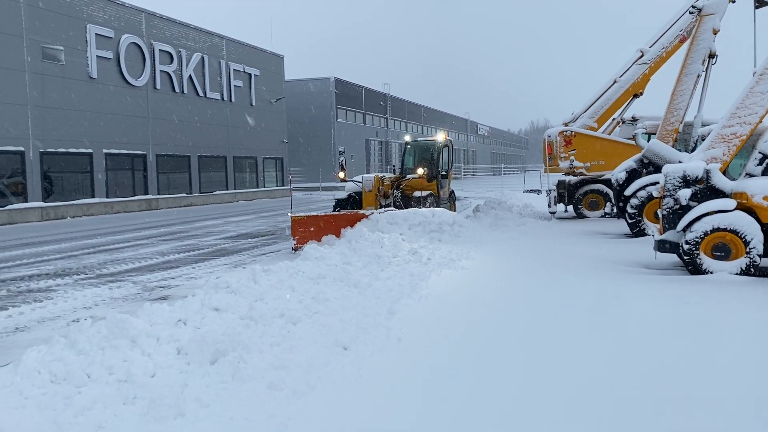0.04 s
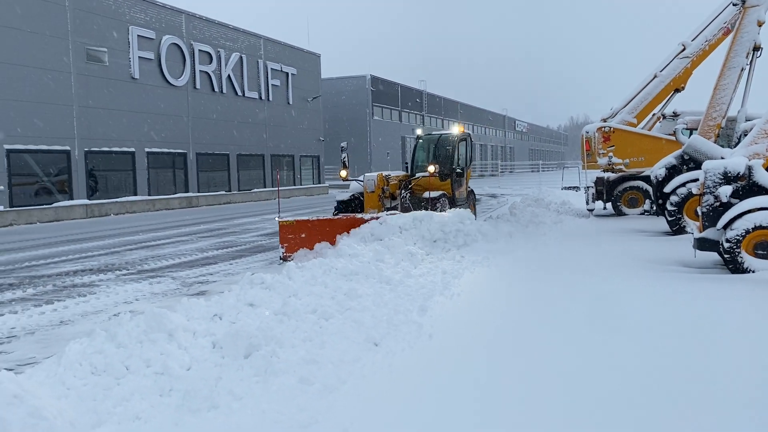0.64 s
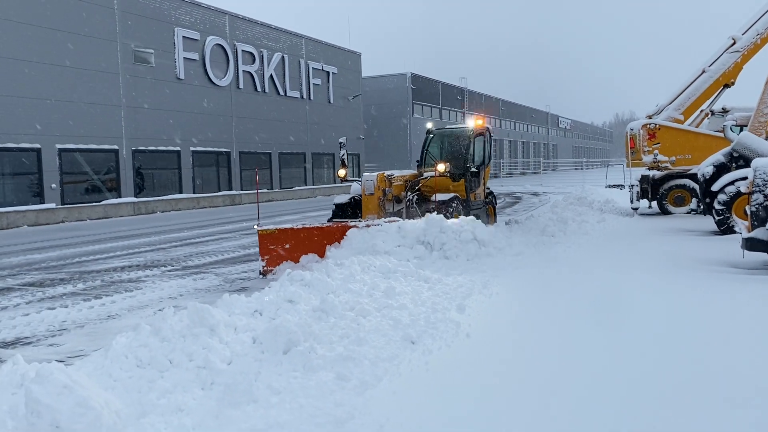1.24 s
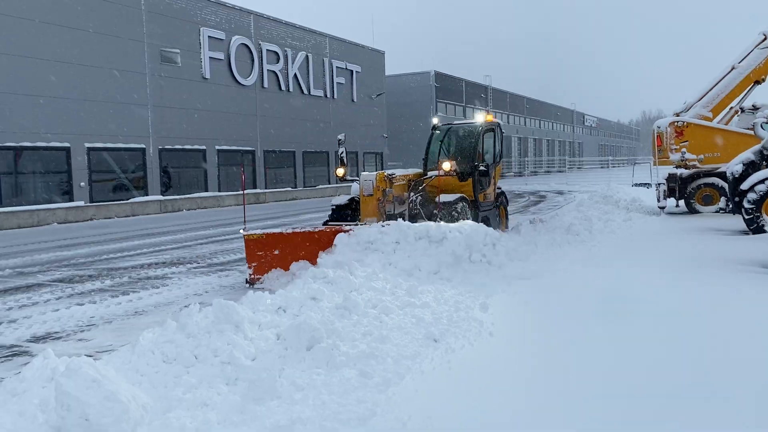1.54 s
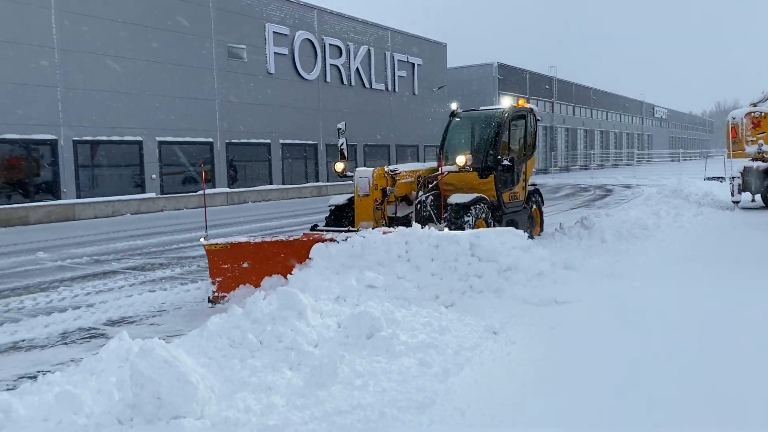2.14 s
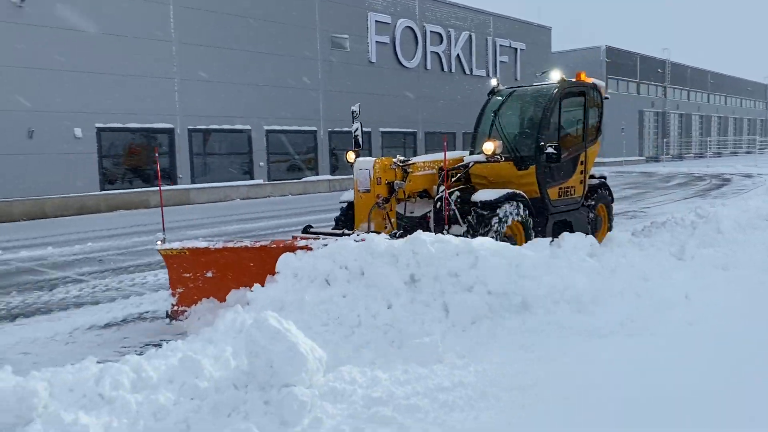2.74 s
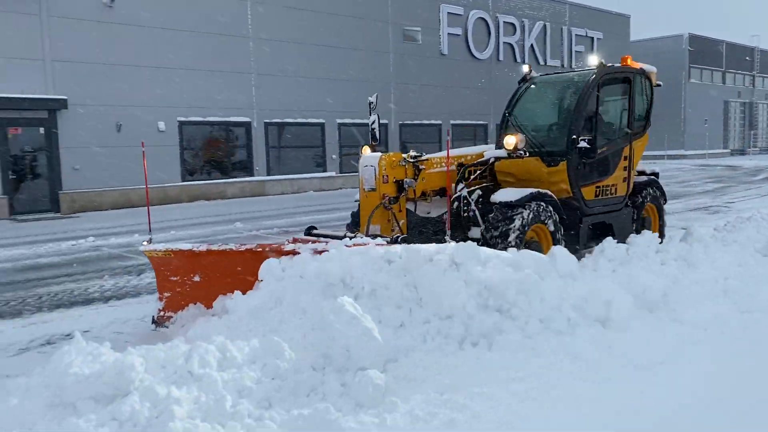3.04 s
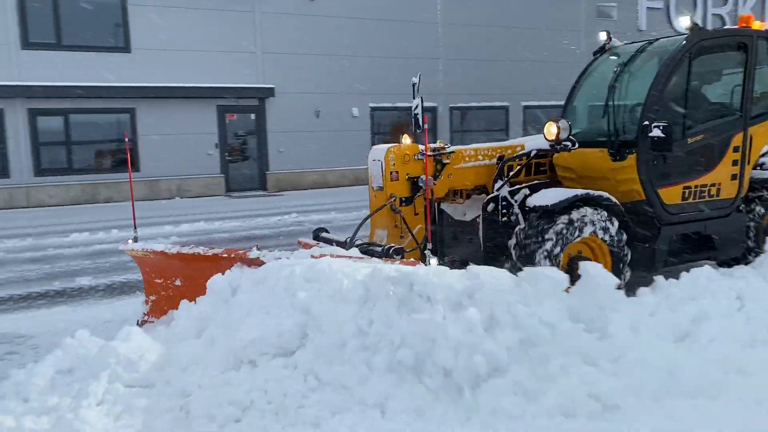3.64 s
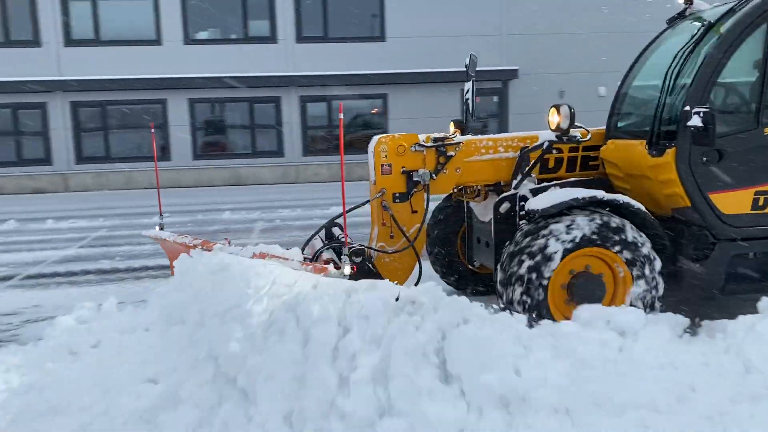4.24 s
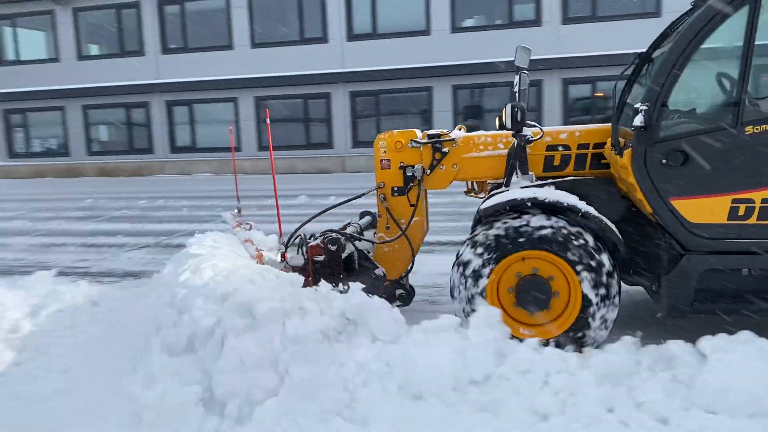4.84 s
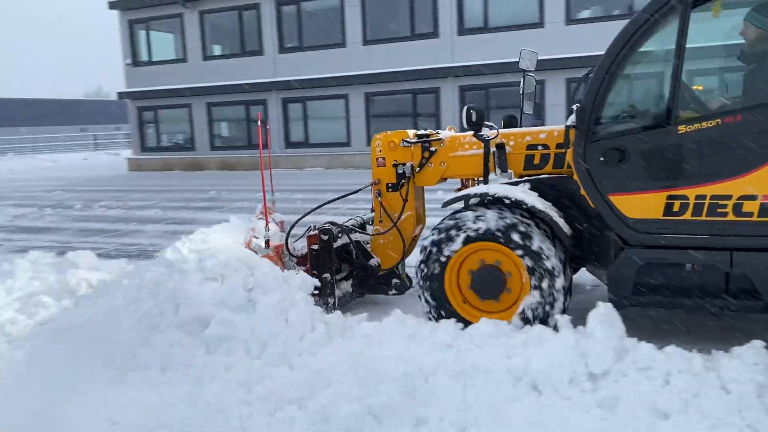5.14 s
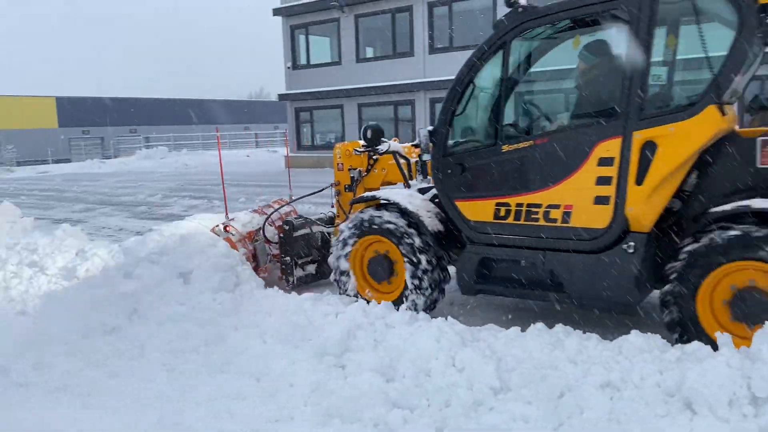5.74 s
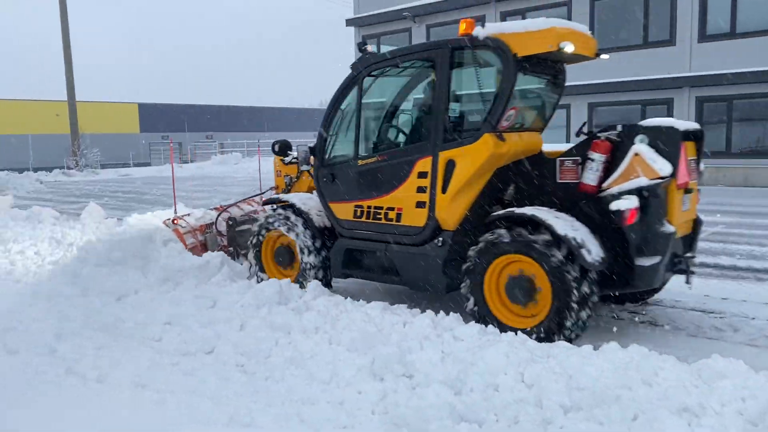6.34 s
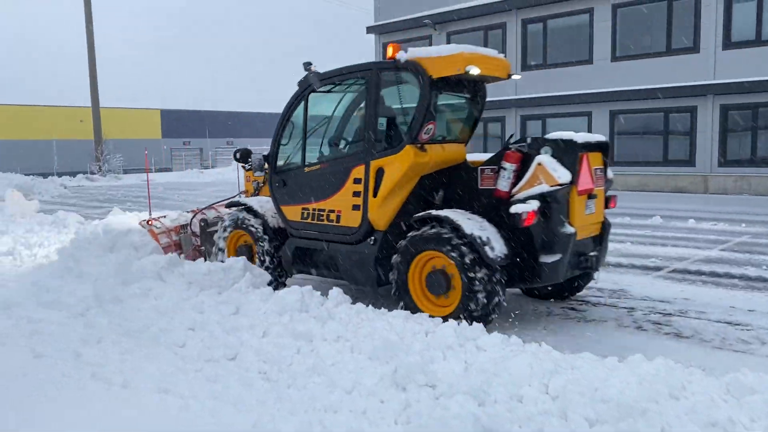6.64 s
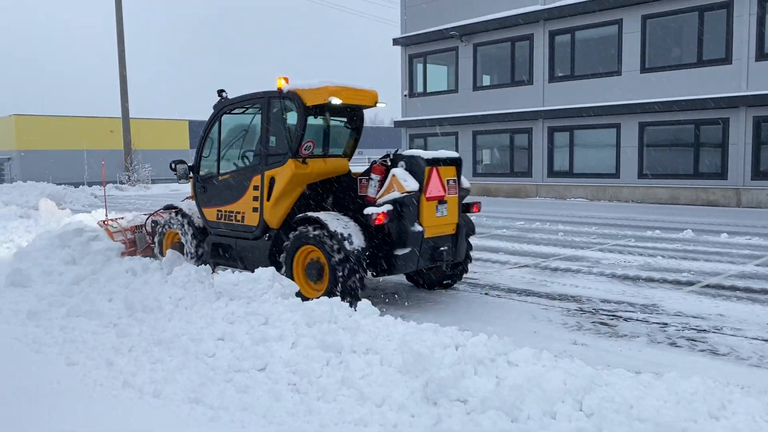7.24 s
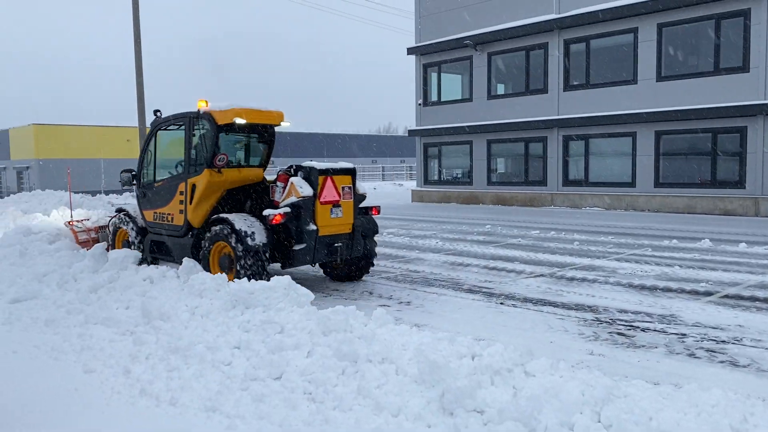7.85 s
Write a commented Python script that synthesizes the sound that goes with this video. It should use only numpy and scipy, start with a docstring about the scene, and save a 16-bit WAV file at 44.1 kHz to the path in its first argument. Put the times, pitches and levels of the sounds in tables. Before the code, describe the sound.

A diesel loader ploughs snow across an open yard, approaching and passing close to the microphone. Its engine drones, growls and clatters steadily under a wavering hydraulic and gear whine. The blade rumbles and thumps over packed ridges while snow hisses, ticks and crunches faintly. A metal knock comes during the approach and a louder one just after the blade passes. The exhaust drone then deepens in strength as the machine moves away.

```python
"""A diesel telehandler ploughs snow across a yard and passes close by.
Its four-cylinder engine drones through the exhaust, growls, clatters and turns a pump and a fan.
The hydraulic motor's pistons and the axle gears whine with ground speed. The blade rumbles through
the snow, bumps over packed ridges and knocks in its slack mounts. Snow slides, crackles and hisses
under the rear tyre; icy crumbs tick and the crust breaks in short crunches."""
import sys
import numpy as np
from scipy import signal
from scipy.fft import rfft, irfft, next_fast_len
from scipy.io import wavfile
from scipy.ndimage import map_coordinates

SR = 44100
rng = np.random.default_rng(int(sys.argv[2]) if len(sys.argv) > 2 else 0)


def bounce(signal):
    """Save signal as a 16-bit WAV file at the path given by the first command-line argument."""
    frames = np.transpose(np.atleast_2d(signal))
    limited = np.clip(frames, -1, 1)
    pcm = np.round(limited * 32767).astype(np.int16)
    wavfile.write(sys.argv[1], SR, pcm)


N = 351918
TIME_S = np.arange(N) / SR
HIT_S = np.arange(SR // 4) / SR  # time axis of one impact
BLADE_PASS_S, TRAVEL_M_PER_S, CLOSEST_M = 4.51, 1.935, 3.47
BANK_MIDDLE_S, TICK_T60_S = 4.5, 0.012


def amp(db):
    return 10 ** (np.asarray(db) / 20)


def unit(x):
    return x / np.sqrt(np.mean(x ** 2) + 1e-20)


def along(points, hz):
    """Interpolate (Hz, value) points on a log axis."""
    point_hz, values = np.transpose(points)
    return np.interp(np.log(hz + 1), np.log(point_hz + 1), values)


def curve(rows, column=1):
    """One column of a time table, per sample."""
    columns = np.transpose(rows)
    return np.interp(TIME_S, columns[0], columns[column])


def wobble(knots_per_s):
    """Smooth random curve."""
    knots = rng.standard_normal(4096)
    coarse = np.arange(0, N + 64, 64)
    smooth = map_coordinates(knots, [coarse * knots_per_s / SR], mode="wrap")
    return np.interp(np.arange(N), coarse, smooth)


def filtered(x, response):
    """Apply a complex frequency response."""
    size = next_fast_len(N + SR // 4)
    return irfft(rfft(x, size) * response(np.fft.rfftfreq(size, 1 / SR)), size)[..., :N]


# Left-right likeness: (frequency [Hz], correlation [0-1])
COHERENCE = [(100, 0.95), (300, 0.94), (600, 0.55), (900, 0.2), (2000, 0.52), (3300, 0.18), (5700, 0.065),
             (7500, 1), (8500, 1), (16000, 0.9)]
def spread(pair, spectrum):
    """Colour two unrelated signals into left and right, alike in the bass and top treble."""
    def response(hz):
        turn = np.arccos(np.clip(along(COHERENCE, hz), -1, 1)) / 2
        roll_off = 1 / (1 + (hz / spectrum[-1][0]) ** 4)
        return amp(along(spectrum, hz)) * roll_off * np.array([np.cos(turn), np.sin(turn)])
    mid, side = filtered(pair, response)
    return np.array([mid + side, mid - side])


def rush(spectrum, source=None):
    """Coloured stereo noise, rms 1."""
    return unit(spread(rng.standard_normal((2, N)) if source is None else source, spectrum))


def angle(hz):
    """Running phase in radians."""
    return 2 * np.pi * np.cumsum(hz) / SR


def tone(phase, fade_db, fade_hz, blur_rad, blur_hz, width_rad, wander_hz=1.48):
    """Sine of rms about 1; shifting reflections make it fade, blur and wander between the ears."""
    apart = width_rad * wobble(wander_hz) * np.array([[1], [-1]])
    fade = amp(fade_db * np.tanh(wobble(fade_hz)))
    return np.sqrt(2) * fade * np.sin(phase + blur_rad * wobble(blur_hz) + apart)


def add(track, start_s, sound):
    """Mix a sound into a track."""
    part = track[..., round(start_s * SR):][..., :sound.shape[-1]]
    part += sound[..., :part.shape[-1]]


def burst(t60_s):
    """Decaying stereo noise."""
    return rng.standard_normal((2, len(HIT_S))) * amp(-60 * HIT_S / t60_s)


def shatter(impulses):
    """Turn each impulse into a short crack."""
    return signal.fftconvolve(impulses[None], burst(TICK_T60_S), axes=1)[:, :N]


def passing(db, behind_m, falloff):
    """Gain of a part behind_m behind the blade: db when closest, falling as 1 / distance ** falloff."""
    ahead_m = TRAVEL_M_PER_S * (TIME_S - BLADE_PASS_S) - behind_m
    return amp(db) * (CLOSEST_M / np.hypot(CLOSEST_M, ahead_m)) ** falloff


def in_bank(width_s):
    """Depth of the blade in the snow bank, 0-1."""
    return np.exp(-((TIME_S - BANK_MIDDLE_S) / width_s) ** 2)


# Exhaust drone: (time [s], relative fundamental level [dB], octave level [dB])
EXHAUST_DB = [(0, -35, -46), (.6, -32.5, -52), (1.3, -30, -42), (1.8, -35.5, -65), (2.5, -32.5, -35.5),
              (3.1, -27.5, -54), (3.45, -33.5, -43), (3.9, -32, -37.5), (4.65, -28, -31), (5.2, -23.5, -45),
              (5.6, -23, -29), (6.15, -23, -31), (6.95, -23, -43), (7.98, -23.5, -36.5)]
# Third exhaust harmonic: (time [s], level [dB])
EXHAUST_THIRD_DB = [(0, -54.5), (1.2, -48), (1.6, -43.5), (2.5, -39.5), (2.9, -45), (3.4, -42), (4.2, -40),
                    (5, -42), (5.6, -46), (6.2, -43.5), (7, -39.5), (7.98, -42.5)]
def exhaust(firing):
    """Firing pulses drone from a rear-facing tailpipe, louder once the machine has passed."""
    drone = tone(firing, fade_db=1, fade_hz=6.2, blur_rad=0.038, blur_hz=47, width_rad=0.017)
    octave = tone(2 * firing, fade_db=1.5, fade_hz=7.8, blur_rad=0.63, blur_hz=13, width_rad=0.089)
    third = tone(3 * firing, fade_db=4.5, fade_hz=5.6, blur_rad=0.26, blur_hz=13, width_rad=0.099)
    return (amp(curve(EXHAUST_DB) + 0.75) * drone
            + amp(curve(EXHAUST_DB, 2)) * octave
            + amp(curve(EXHAUST_THIRD_DB)) * third)


def engine_lines(firing, orders):
    """Unsteady tones at multiples of the firing rate."""
    return sum(
        amp(db) * tone(order * firing, fade_db=3.5, fade_hz=5, blur_rad=0.6, blur_hz=8, width_rad=0.17)
        for order, db in orders)


# Intake hum: (time [s], relative level of lower lines [dB], of upper line [dB])
INTAKE_DB = [(0, -47, -66), (1, -44, -56), (1.5, -39, -40), (2.5, -35, -41), (3.3, -38, -41.5),
             (3.9, -37.5, -40), (4.5, -36.5, -36), (5, -50, -32), (5.6, -39, -37.5), (5.8, -41, -50),
             (6.5, -37.5, -32.5), (6.8, -48, -40), (7.7, -38, -40.5), (7.98, -42, -51)]
# Lower intake lines: (order [x firing rate], relative level [dB])
INTAKE_LINES = [(4.5, -6), (4.75, -3)]
def intake(firing):
    """The air intake hums on three engine orders."""
    lower = amp(curve(INTAKE_DB)) * engine_lines(firing, INTAKE_LINES)
    upper = amp(curve(INTAKE_DB, 2)) * engine_lines(firing, [(5, -1.2)])
    return lower + upper


# Pump tone: (time [s], relative level [dB])
PUMP_DB = [(0, -55), (.05, -38.5), (.18, -46), (.27, -33), (.46, -59), (.55, -38), (.76, -47), (.87, -37),
           (1.2, -40), (1.38, -45.5), (1.48, -37.5), (1.58, -44.5), (1.71, -35), (1.86, -52), (1.94, -35),
           (2.36, -43.5), (2.62, -32.5), (2.82, -38), (2.92, -32), (3.27, -29.5), (3.38, -32),
           (3.47, -30.5), (3.58, -31.5), (3.74, -28), (4.09, -27.5), (4.21, -36), (4.46, -34), (4.7, -28.5),
           (4.9, -34.5), (5.04, -29), (5.18, -32), (5.28, -42), (5.45, -28), (5.55, -34), (5.83, -25.5),
           (6.06, -39.5), (6.26, -27.5), (6.47, -37), (6.6, -31), (6.92, -28), (7.2, -31), (7.46, -35.5),
           (7.55, -31.5), (7.98, -31.5)]
def pump(firing):
    """The pump whines at 9 x the firing rate; farther off, wall echoes make it flutter more."""
    flutter_db = 1 / passing(db=-4, behind_m=8.9, falloff=0.75)
    whine = tone(9 * firing, fade_db=flutter_db, fade_hz=14, blur_rad=0.1, blur_hz=36, width_rad=0.16)
    return amp(curve(PUMP_DB) + 0.5) * whine


# Fan tone: (time [s], level [dB])
FAN_DB = [(0, -46), (1, -46), (1.5, -56), (2.1, -53), (2.7, -40.5), (4.5, -49), (6, -41), (6.6, -46),
          (7.98, -42)]
# Cooling air: (frequency [Hz], relative density [dB])
RADIATOR_SPECTRUM = [(700, -20), (1200, 6), (1400, -2), (2000, -4.5), (3200, -22.5), (6000, -15)]
# Rear hiss: (frequency [Hz], relative density [dB])
RASP_SPECTRUM = [(2000, -16), (2800, -2), (3500, -5), (4100, -3), (5200, -18)]
def cooling_fan(firing):
    """The fan sings at 10 x the firing rate; air rushes and hisses at the rear."""
    fan = tone(10 * firing, fade_db=3, fade_hz=7.3, blur_rad=0.75, blur_hz=22, width_rad=0.61)
    air = passing(db=-43.5, behind_m=2, falloff=3.1) * rush(RADIATOR_SPECTRUM)
    rasp = passing(db=-52, behind_m=4.1, falloff=16) * rush(RASP_SPECTRUM)
    return amp(curve(FAN_DB)) * fan + air + rasp


def combustion_noise(firing, spectrum, repeat_share, depth, uneven):
    """Noise that pulses with each firing and partly repeats every four firings."""
    cycle_samples = round(4 * SR / FIRING_HZ[0][1])
    cycle_index = (firing / (8 * np.pi) % 1 * cycle_samples).astype(int)
    repeating = np.sqrt(repeat_share) * rng.standard_normal((2, cycle_samples))[:, cycle_index]
    fresh = np.sqrt(1 - repeat_share) * rng.standard_normal((2, N))
    # uneven cylinders beat at half the firing rate
    pulse = unit(np.exp(depth * np.cos(firing) + uneven * np.cos(firing / 2)))
    return rush(spectrum, repeating + fresh) * pulse


# Block noise, low, middle and high: (frequency [Hz], relative density [dB])
BOOM_SPECTRUM = [(90, -8.5), (160, -3.5), (240, -4), (300, -2), (380, -5), (600, -28)]
GROWL_SPECTRUM = [(250, -41), (380, -5), (450, -6), (560, -3.5), (690, 0), (790, -20), (1100, -45)]
CLATTER_SPECTRUM = [(500, -49), (760, 4.5), (850, 3.5), (1000, 3), (1220, 0), (1350, -7), (1560, -2.5),
                    (1750, -11), (2080, -9), (2230, -7.5), (2360, -11.5), (2550, -5.5), (2680, -12.5),
                    (2850, -8), (3200, -17.5), (4200, -25), (7000, -30)]
# Tones in the boom and the growl: (order [x firing rate], relative level [dB])
BOOM_LINES = [(2.5, -17), (3.25, -14), (3.75, -17)]
GROWL_LINES = [(5.5, -15), (6.5, -15.5), (12.5, -18.5), (13.5, -15), (14, -20), (14.5, -16), (17, -16.5),
               (18, -31), (22, -27.5)]
# Engine load from throttle and snow bank: (time [s], gain [dB])
LOAD_DB = [(0, -0.5), (1, -1), (1.5, 0), (1.95, 0), (2.4, 1), (3.2, 0), (4.6, 0), (5.7, -3), (6.7, 0.5),
           (7.98, -1)]
def engine_block(firing):
    """Combustion makes the block boom, growl and clatter, louder under load."""
    boom = combustion_noise(firing, BOOM_SPECTRUM, repeat_share=0.018, depth=0.095, uneven=0.078)
    boom = amp(3.5) * boom + engine_lines(firing, BOOM_LINES)
    growl = combustion_noise(firing, GROWL_SPECTRUM, repeat_share=0.37, depth=0.052, uneven=0.093)
    growl = amp(3.5) * growl + engine_lines(firing, GROWL_LINES)
    flicker = amp(0.8 * wobble(12))
    clatter = combustion_noise(firing, CLATTER_SPECTRUM, repeat_share=0.044, depth=0.037, uneven=0.08)
    roar = (passing(db=-33, behind_m=1.15, falloff=1.35) * boom
            + passing(db=-37, behind_m=2.3, falloff=0.72) * growl
            + passing(db=-37.5, behind_m=1.93, falloff=0.72) * flicker * clatter)
    return amp(curve(LOAD_DB)) * roar


# Engine speed: (time [s], firing rate [Hz])
FIRING_HZ = [(0, 68.3), (1, 68.6), (1.6, 71.9), (1.85, 71.7), (2.2, 70.7), (2.6, 70.4), (3, 69.3),
             (3.7, 69.9), (4.5, 69.5), (5.7, 68.1), (6.1, 68.2), (6.7, 67.6), (7.98, 67.7)]
def engine():
    """One crankshaft times all parts of the four-cylinder diesel."""
    firing = angle(curve(FIRING_HZ))
    return exhaust(firing) + intake(firing) + pump(firing) + cooling_fan(firing) + engine_block(firing)


# Low mesh harmonics: (order [x mesh rate], closest level [dB], behind blade [m], falloff exponent)
GEAR_LINES = [(1, -40.5, 0.092, 1.5), (2, -51, 1, 1.4)]
# High mesh harmonics: (order [x mesh rate], relative level [dB])
OVERTONE_LINES = [(4, 2), (5, -8)]
# High mesh harmonics together: (time [s], relative level [dB])
OVERTONE_DB = [(0, -61.5), (1.25, -60), (1.4, -51), (1.6, -56.5), (2.7, -54.5), (2.9, -51), (3.08, -56),
               (3.25, -52), (3.42, -55), (3.7, -51.5), (4.3, -54), (4.9, -57), (5.4, -56), (5.9, -56),
               (6.35, -53), (7.1, -55.5), (7.3, -58), (7.98, -68)]
# Third mesh harmonic, ringing from the axle housing: (time [s], relative level [dB])
HOUSING_DB = [(0, -61), (1.1, -59), (1.4, -56.5), (2.3, -56.5), (2.75, -50), (3.05, -53), (3.6, -44.5),
              (4.2, -47.5), (4.45, -48.5), (4.8, -49), (5.5, -49), (5.8, -45), (6.3, -49), (6.9, -49),
              (7.15, -53), (7.4, -48.5), (7.7, -53.5), (7.98, -61)]
# Gear blur with distance, most behind the machine: (time [s], blur factor)
GEAR_BLUR = [(0, 1.65), (2, 1.45), (3.4, 1), (4.4, 1), (5.8, 1.2), (6.3, 2.2), (7.98, 2.4)]
def axle_gears(piston_hz):
    """Unevenly loaded teeth whine and flutter; the rear axle beats against the front one."""
    # in the bank the tyres bite and slip: speed surges and judders
    surge_hz, mesh_per_stroke = 2.82, 1.851
    surge = in_bank(1.7) * np.cos(2 * np.pi * surge_hz * (TIME_S - BANK_MIDDLE_S))
    judder = in_bank(2.47) * wobble(14)
    mesh_hz = mesh_per_stroke * piston_hz * (1 + 0.0105 * surge + 0.004 * judder)
    front = angle(mesh_hz)
    rear = angle(mesh_hz * (1 + 0.00706 * wobble(7)))
    blur_rad = 0.23 * curve(GEAR_BLUR)

    def axle(mesh, order):
        return tone(order * mesh, fade_db=2.5, fade_hz=90, blur_rad=order * blur_rad, blur_hz=90,
                    width_rad=0.67, wander_hz=18)

    def teeth(order):
        return unit(axle(front, order) + amp(-2.5) * axle(rear, order))

    low = sum(passing(db, behind_m, falloff) * teeth(order)
              for order, db, behind_m, falloff in GEAR_LINES)
    high = amp(curve(OVERTONE_DB) - 2.8) * sum(amp(db) * teeth(order) for order, db in OVERTONE_LINES)
    housing = amp(curve(HOUSING_DB) + 0.4 - surge) * teeth(3)
    return low + high + housing


# Piston harmonics: (order [x piston rate], closest level [dB], behind blade [m], falloff exponent)
PISTON_LINES = [(1, -41, 0.19, 0.66), (2, -49, 0.88, 1.1), (3, -52.5, 1, 1.5), (5, -64.5, 0.7, 0.55)]
def motor_pistons(piston_hz):
    """The hydraulic motor sings at harmonics of its piston strokes."""
    stroke = angle(piston_hz)
    return sum(
        passing(db, behind_m, falloff)
        * tone(order * stroke, fade_db=4.5, fade_hz=8, blur_rad=0.26 * order, blur_hz=25, width_rad=0.63)
        for order, db, behind_m, falloff in PISTON_LINES)


# Hydraulic motor speed: (time [s], piston rate [Hz])
PISTON_HZ = [(0, 482), (1.3, 487), (2.2, 499), (3, 509), (3.45, 514), (3.85, 516), (4.9, 513), (5.6, 511),
             (6.4, 512), (6.9, 509), (7.15, 500), (7.45, 498), (7.7, 491), (7.98, 490)]
def drive():
    """Motor and axles turn in step with ground speed."""
    piston_hz = curve(PISTON_HZ)
    return axle_gears(piston_hz) + motor_pistons(piston_hz)


# Hum pitch: (time [s], frequency [Hz])
HUM_HZ = [(0, 58.5), (.5, 57), (1.4, 56.2), (2.2, 54.5), (3, 57), (7.98, 55)]
# Hum strength: (time [s], level [dB])
HUM_DB = [(0, -43), (.35, -50), (.55, -37), (.9, -38), (1.4, -37), (1.8, -44), (2.2, -37.5), (3.2, -42),
          (5, -42), (7.98, -54)]
def low_hum():
    """A low hum beats against the exhaust."""
    hum = tone(angle(curve(HUM_HZ)), fade_db=1.5, fade_hz=4.5, blur_rad=0.16, blur_hz=6.8, width_rad=0.03)
    return amp(curve(HUM_DB)) * hum


# Narrow noise band: (frequency [Hz], relative density [dB])
WHISTLE_SPECTRUM = [(4200, -28), (4520, -2), (4640, -4), (4950, -26), (9000, -60)]
def whistle():
    """A thin, breathy whistle ahead of the machine."""
    return passing(db=-66.5, behind_m=-6.5, falloff=1.2) * rush(WHISTLE_SPECTRUM)


# Ploughing strength: (time [s], relative level [dB])
RUMBLE_DB = [(0.1, -46), (1.85, -45.5), (2.28, -36.5), (3.38, -41), (3.45, -51), (3.58, -35.5), (4.03, -43),
             (4.93, -36), (6.2, -38.5), (7.65, -42), (7.85, -45)]
# Ploughing noise: (frequency [Hz], relative density [dB])
RUMBLE_SPECTRUM = [(20, -36), (35, -20), (50, -5), (62, -4), (90, -7), (120, -10.5), (170, -25), (300, -77)]
def blade_rumble():
    """The blade rumbles through lumpy snow."""
    lumps_db = 2 * wobble(8)
    return amp(curve(RUMBLE_DB) + 5.5 + lumps_db) * rush(RUMBLE_SPECTRUM)


# Sliding snow: (time [s], relative level [dB])
SLIDE_DB = [(0.0, -56), (1.13, -58.5), (1.98, -52.5), (2.29, -57), (3.95, -56.5), (5.02, -61.5),
            (6.09, -54), (6.24, -53), (6.56, -55.5), (7.49, -58), (7.98, -57)]
# Sliding, fizzing and tyre-pressed snow: (frequency [Hz], relative density [dB])
SLIDE_SPECTRUM = [(2000, 4), (3600, 7), (4700, 4.5), (5400, 2.5), (6300, 0), (7500, -4), (9000, -8.5),
                  (16000, -26)]
FIZZ_SPECTRUM = [(5000, -28), (8000, -5.5), (10300, -2), (12000, -4), (14300, -2.5), (15800, -9)]
TYRE_SPECTRUM = [(4000, -25), (5800, -5), (7300, 0), (9000, 0), (14000, -20)]
def snow_hiss():
    """Wet snow slides, louder on the left, fizzes and hisses under the rear tyre."""
    slide = amp(curve(SLIDE_DB) + 5.5) * rush(SLIDE_SPECTRUM) * amp([[1.6], [-1.6]])
    fizz = passing(db=-56, behind_m=1.4, falloff=0.97) * rush(FIZZ_SPECTRUM)
    tyre = passing(db=-58.5, behind_m=3, falloff=21) * rush(TYRE_SPECTRUM)
    return slide + fizz + tyre


def bank_reflection(hiss):
    """As the rear tyre passes, hiss also arrives off the snow bank, ever later: a falling swish."""
    since_s = TIME_S - 6.2
    delay_s = 0.115e-3 * np.exp(1.3 * since_s)
    echo = np.array([np.interp(TIME_S - delay_s, TIME_S, side) for side in hiss])
    echo_gain = amp(-7) * np.exp(-(since_s / 0.33) ** 2)
    return (hiss + echo_gain * echo) / np.hypot(1, echo_gain)


# Ring of cracking ice: (frequency [Hz], gain [dB])
ICE_SPECTRUM = [(3000, -17), (7000, -12), (9000, -2), (10500, -3.5), (12500, -7.5), (14500, -5),
                (16000, -8), (19000, -14)]
def snow_crackle(grains_per_s=130):
    """Fine grains of snow crack at random."""
    size_db = 1.9 * np.minimum(rng.exponential(size=N), 4)
    grains = (rng.random(N) < grains_per_s / SR) * rng.standard_normal(N) * amp(size_db)
    return passing(db=-65.5, behind_m=0.8, falloff=0.79) * unit(spread(shatter(grains), ICE_SPECTRUM))


# Largest crumbs: (time [s], relative level [dB])
LARGE_CRUMBS = [(0.609, -50), (0.72, -49), (0.815, -44), (1.06, -40), (1.247, -48), (1.345, -35.5),
                (1.477, -45), (1.516, -41), (1.6546, -43), (1.7474, -42), (1.798, -44), (1.8238, -40.5),
                (2.042, -46), (2.252, -44), (2.7556, -35), (2.767, -41), (2.782, -42), (2.882, -43),
                (2.99, -40), (3.0944, -41), (3.1587, -41), (3.807, -42), (3.93, -38), (3.967, -29),
                (3.980, -37), (3.986, -39), (3.9988, -35), (4.0307, -37), (4.0632, -39), (4.098, -40),
                (4.127, -37), (4.1485, -38), (4.1839, -39), (4.38, -35), (4.6294, -39), (4.6808, -40),
                (4.691, -39), (4.7262, -36), (4.803, -37), (4.8643, -39), (5.058, -41), (5.1257, -41),
                (5.1607, -34), (5.228, -36), (5.3587, -39), (5.539, -42), (6.5196, -37), (6.54, -37),
                (7.203, -45)]
def icy_crumbs(peak_crumbs_per_s=16):
    """Small crumbs tick, mostly in the bank; each large one also pings at its own pitch."""
    falls = rng.random(N) < peak_crumbs_per_s * in_bank(1.7) / SR
    sizes = amp(6 * rng.uniform(-1, 1, N))
    ticks = shatter(falls * sizes * passing(db=-38, behind_m=0.3, falloff=0.5))
    for start_s, db in LARGE_CRUMBS:
        ping_hz = 10500 * 2 ** rng.normal(0, 0.13)
        ping = np.sin(2 * np.pi * ping_hz * HIT_S) * amp(-5 - 60 * HIT_S / TICK_T60_S)
        add(ticks, start_s, amp(db + 5) * (burst(TICK_T60_S) + ping))
    return spread(ticks, ICE_SPECTRUM) + amp(-13) * spread(ticks, SLIDE_SPECTRUM)


# Packed ridges: (time [s], peak level [dB], frequency [Hz])
RIDGE_BUMPS = [(2.297, -25, 81.5), (2.506, -24, 85), (2.701, -21.5, 114), (2.998, -17, 69),
               (3.573, -22, 80), (3.648, -20, 74), (3.845, -27.5, 85), (4.683, -18, 79), (5.071, -20, 100)]
def blade_bumps(rise_s=0.014):
    """The blade thumps as it rides over packed snow."""
    track = np.zeros((2, N))
    swell = (HIT_S / rise_s * np.exp(1 - HIT_S / rise_s)) ** 2
    for start_s, db, hz in RIDGE_BUMPS:
        add(track, start_s, amp(db) * swell * np.sin(2 * np.pi * (hz * HIT_S + rng.random())))
    return track


# Modes of the blade's steel frame: (frequency [Hz], relative level [dB], t60 [s])
STEEL_MODES = [(320, -4, .05), (480, -6, .035), (600, 0, .035), (735, 0, .04), (775, -5, .035),
               (1130, -1.5, .05), (1195, -4, .04), (1560, -2, .07), (1660, -9, .05), (1930, -7, .05),
               (2350, -5, .05), (2800, -1, .05), (3300, -6, .04)]
# Mount contacts: (time [s], peak level [dB], centre [Hz], spread [octaves])
MOUNT_KNOCKS = [(2.648, -19.5, 730, 0.16), (4.700, -28, 1200, .6), (4.875, -32, 1550, 0.15),
                (5.024, -22.5, 1600, .55), (5.029, -17, 1120, 0.28), (5.032, -14, 590, 0.25),
                (5.042, -14, 310, 0.4), (5.045, -18.5, 1350, 0.4), (5.046, -29, 3000, 0.5)]
def blade_knocks():
    """Slack mounts knock; each contact cracks and rings the steel modes near its own pitch."""
    track = np.zeros((2, N))
    hz, mode_db, t60_s = np.transpose(STEEL_MODES)[:, :, None]
    attack = 1 - np.exp(-HIT_S / 0.0029)
    for start_s, db, centre_hz, octaves in MOUNT_KNOCKS:
        off_centre_db = -4.9 * (np.log2(hz / centre_hz) / octaves) ** 2
        size = amp(mode_db + off_centre_db + rng.normal(0, 0.53, hz.shape))
        phase = rng.uniform(0, 2 * np.pi, hz.shape) + rng.normal(0, 0.41, (2, *hz.shape))
        modes = size * amp(-60 * HIT_S / t60_s) * np.sin(2 * np.pi * hz * HIT_S + phase)
        band_hz = np.clip(centre_hz * np.exp2([-octaves, octaves]), 100, SR / 4)
        contact = signal.butter(3, band_hz, "band", fs=SR)
        crack = signal.lfilter(*contact, rng.standard_normal((2, len(HIT_S))))
        blow = (modes.sum(axis=1) + crack * amp(13 - 60 * HIT_S / 0.06)) * attack
        add(track, start_s, amp(db) * blow / np.abs(blow).max())
    return track


# Crust breaks: (time [s], relative level [dB], t60 [s])
CRUST_BREAKS = [(2.750, -51, 0.13), (3.697, -40.5, 0.093), (3.950, -57, .25), (3.985, -43, 0.12),
                (4.683, -45, 0.075), (5.224, -41, .03), (6.516, -52, .04)]
def crust_crunches(rise_s=0.025, grit_db=4):
    """The snow crust breaks in short, gritty bursts."""
    track = np.zeros((2, N))
    attack = 1 - np.exp(-HIT_S / rise_s)
    for start_s, db, t60_s in CRUST_BREAKS:
        grit = amp(grit_db * wobble(470)[:len(HIT_S)])
        add(track, start_s, amp(db) * attack * grit * burst(t60_s))
    return amp(15) * spread(track, ICE_SPECTRUM) + amp(13.5) * spread(track, SLIDE_SPECTRUM)


# Machine's stereo balance: (time [s], left minus right [dB])
BALANCE_DB = [(0, .3), (1.5, 1), (2.5, .4), (3.2, .4), (4.5, -1), (5.6, -.5), (7.98, .7)]
def scene():
    """Machine and snow in the open yard; the balance sways as the listener turns after them."""
    balance = amp(curve(BALANCE_DB) * np.array([[0.5], [-0.5]]))
    machine = engine() + drive() + low_hum() + whistle() + blade_rumble() + blade_bumps() + blade_knocks()
    snow = bank_reflection(snow_hiss()) + snow_crackle() + icy_crumbs() + crust_crunches()
    return balance * machine + snow


# Phase between microphone ports: (frequency [Hz], left lead [rad])
PORT_LEAD_RAD = [(6300, 0), (8300, -3.14), (11000, -6.28), (13400, -9.42), (15600, -12.57)]
def record(dry):
    """The two microphone ports differ in treble phase; deep bass and top treble are cut."""
    low_cut_hz, top_hz = 27.6, 15830

    def response(hz):
        lead_rad = np.interp(hz, *np.transpose(PORT_LEAD_RAD)) * np.array([[0.5], [-0.5]])
        low_cut = 1 - 1 / (1 + (hz / low_cut_hz) ** 4)
        return np.exp(1j * lead_rad) * low_cut * (hz < top_hz)
    return filtered(dry, response)


dry = scene()
out = record(dry)
bounce(out)
```